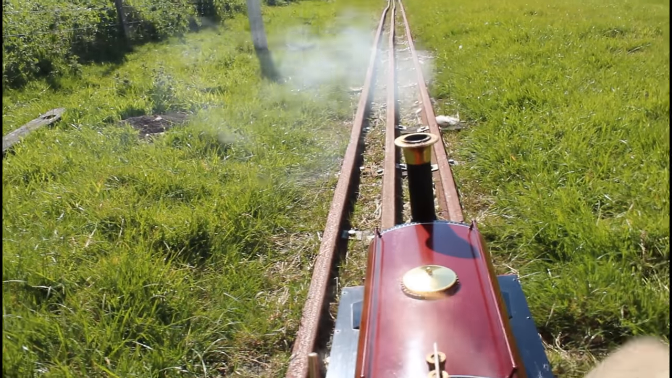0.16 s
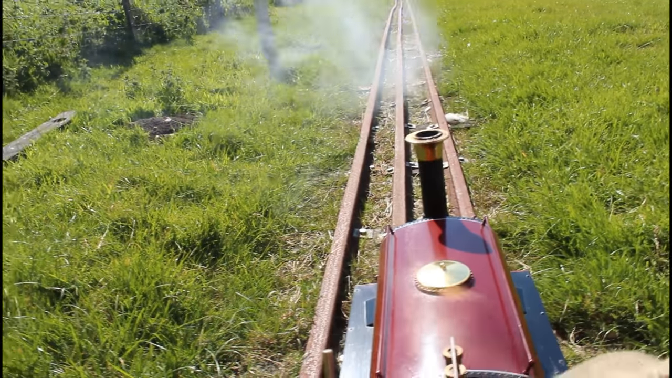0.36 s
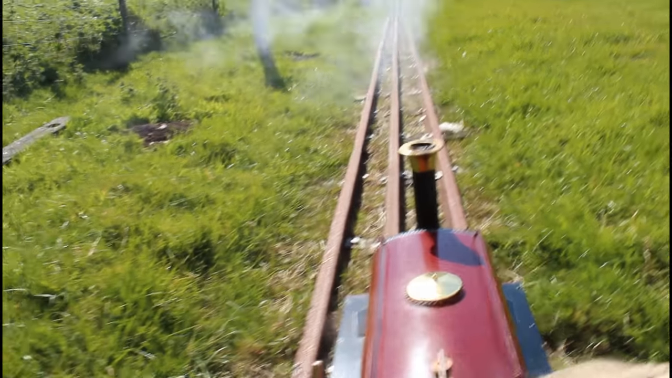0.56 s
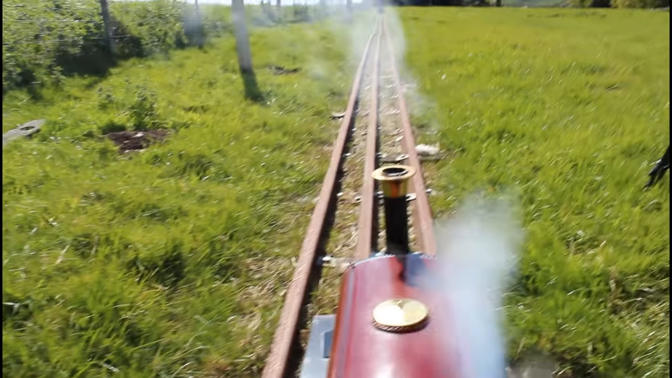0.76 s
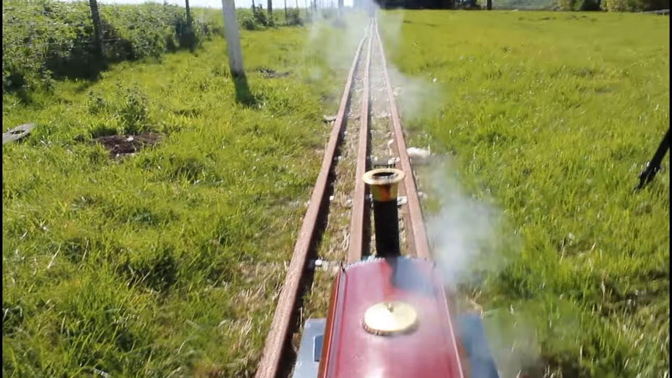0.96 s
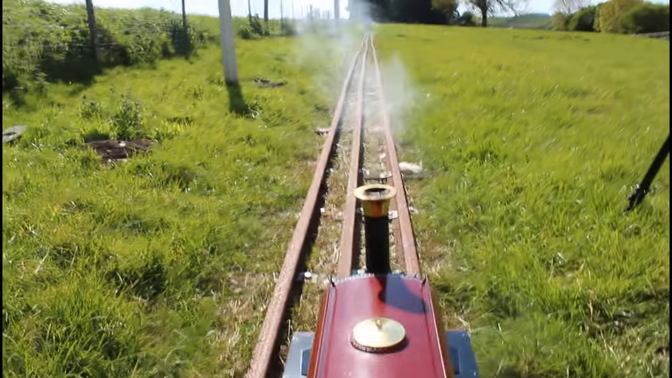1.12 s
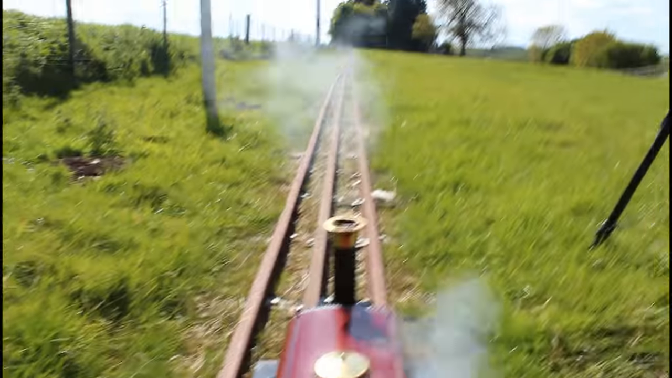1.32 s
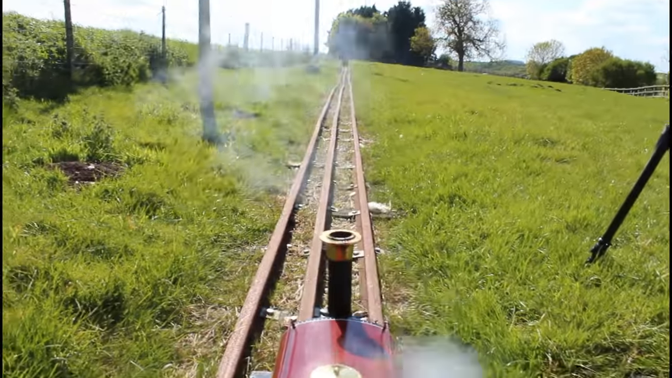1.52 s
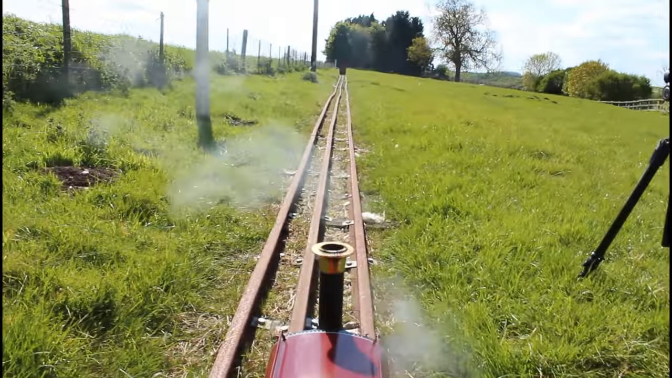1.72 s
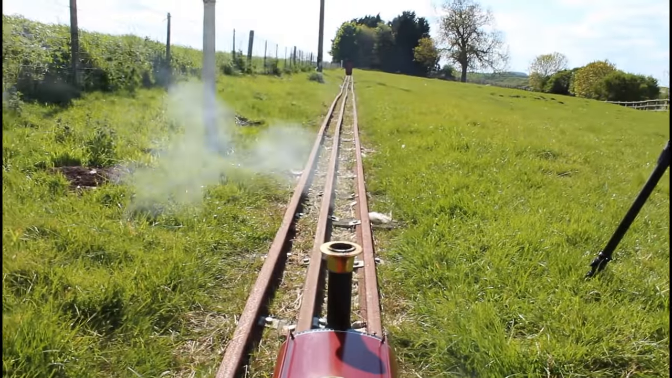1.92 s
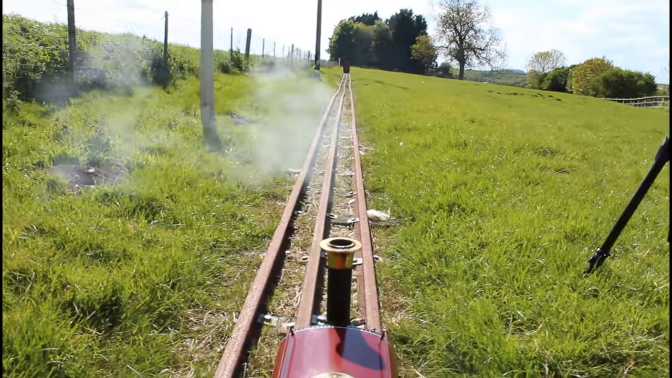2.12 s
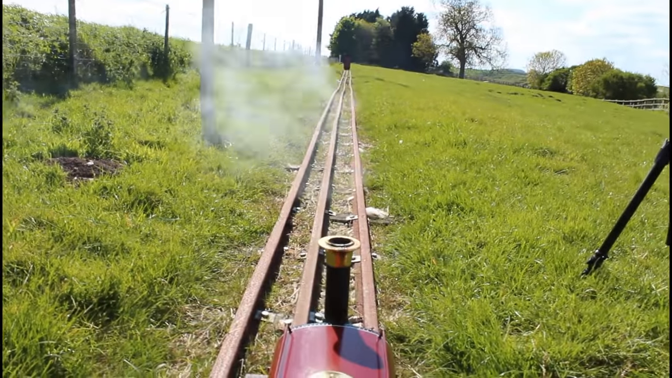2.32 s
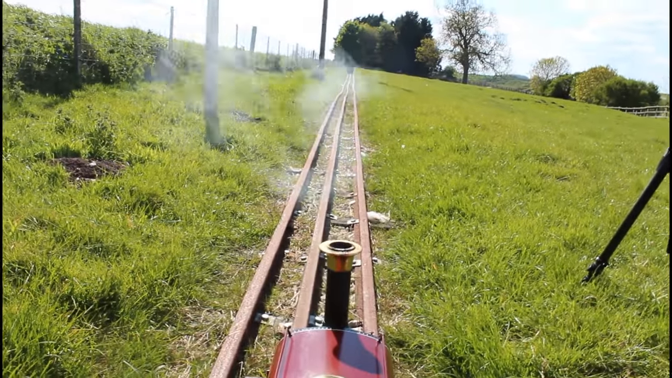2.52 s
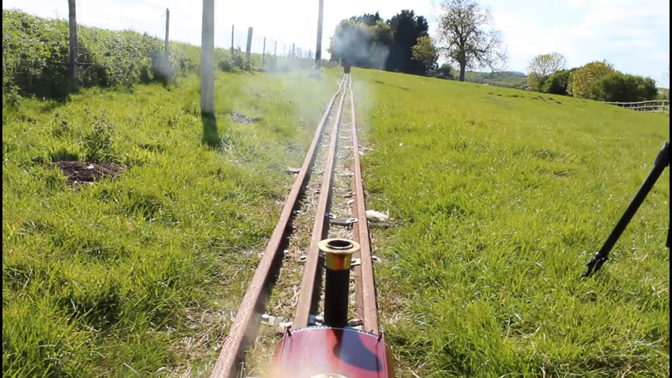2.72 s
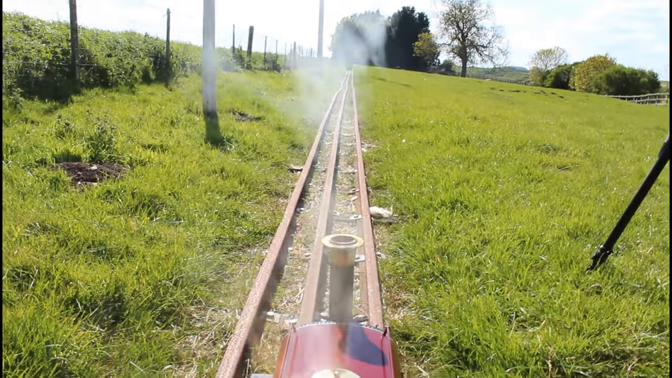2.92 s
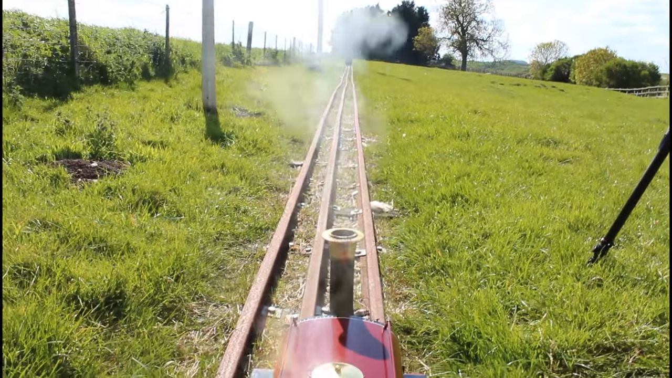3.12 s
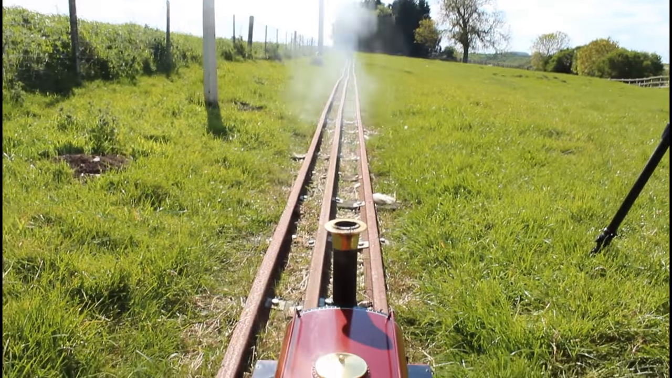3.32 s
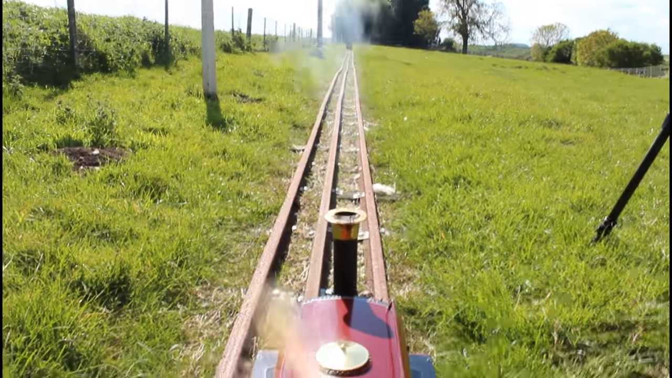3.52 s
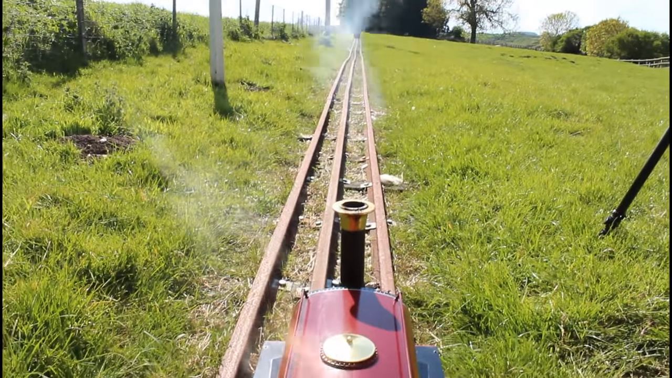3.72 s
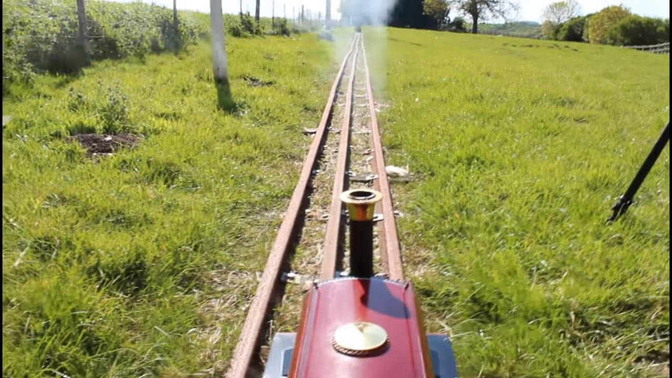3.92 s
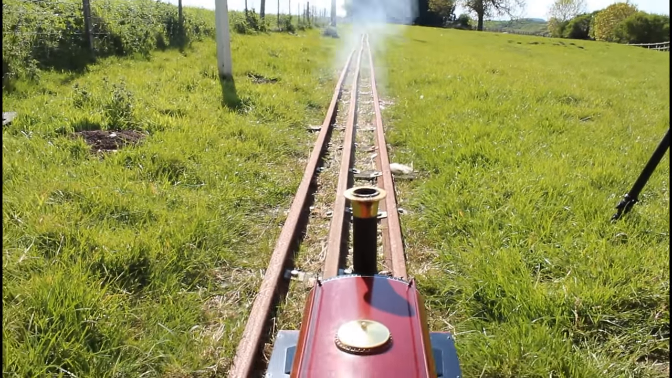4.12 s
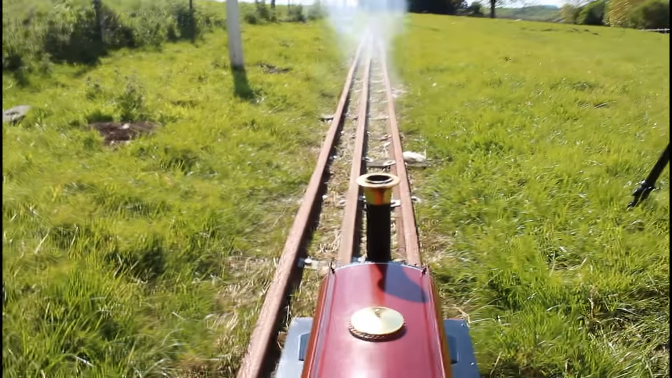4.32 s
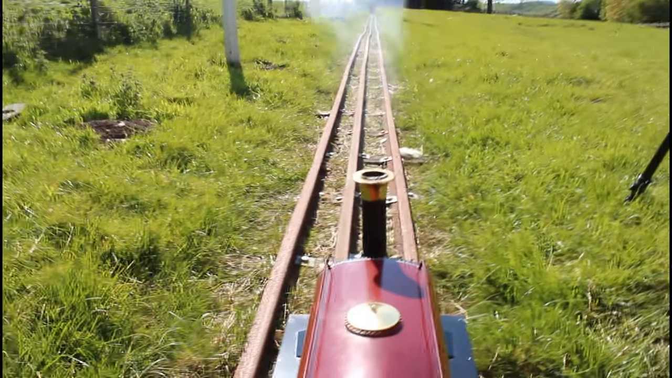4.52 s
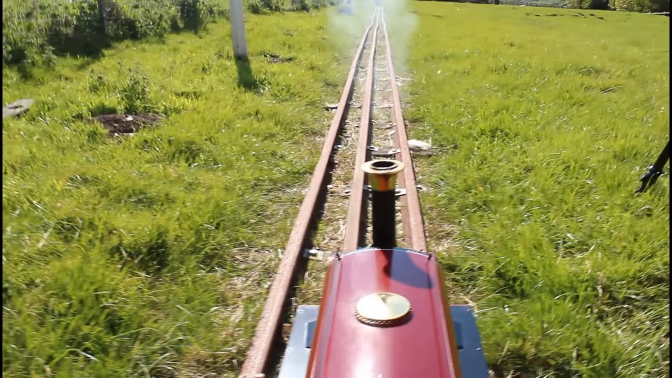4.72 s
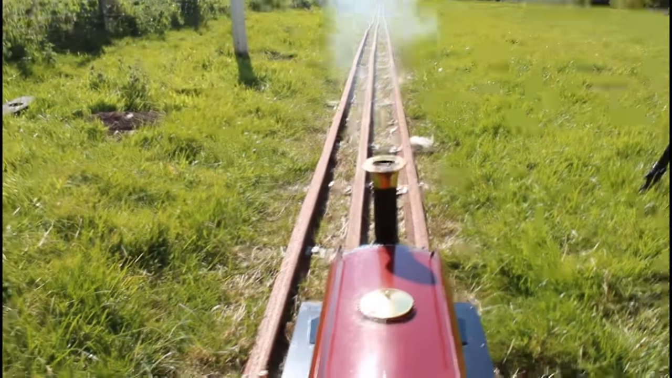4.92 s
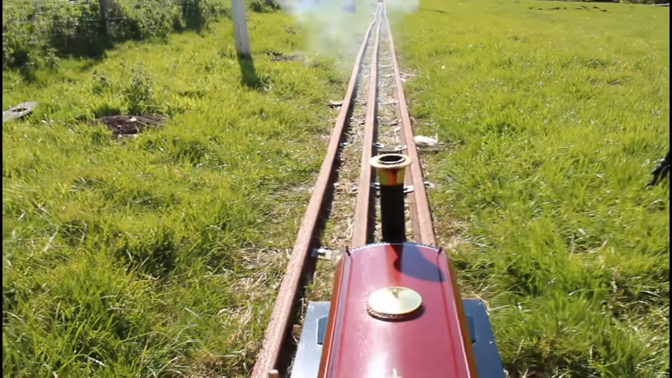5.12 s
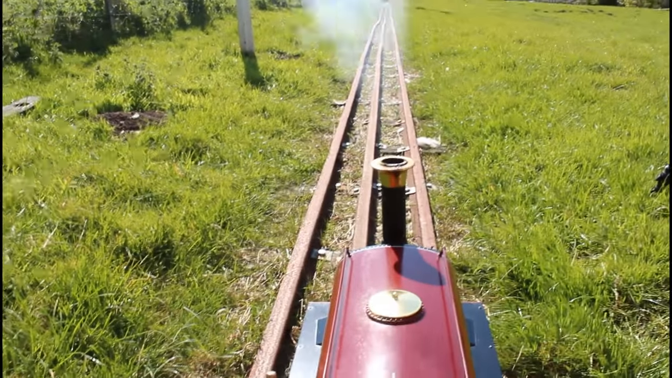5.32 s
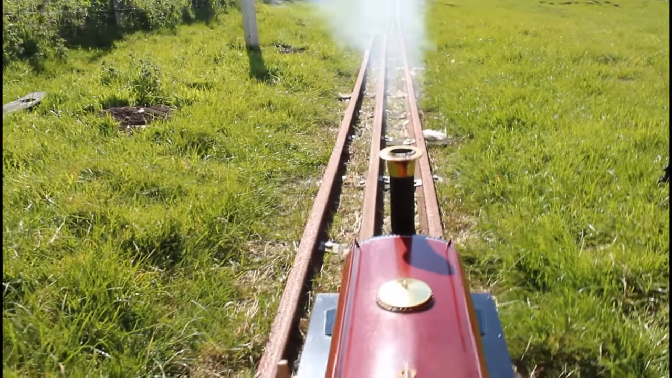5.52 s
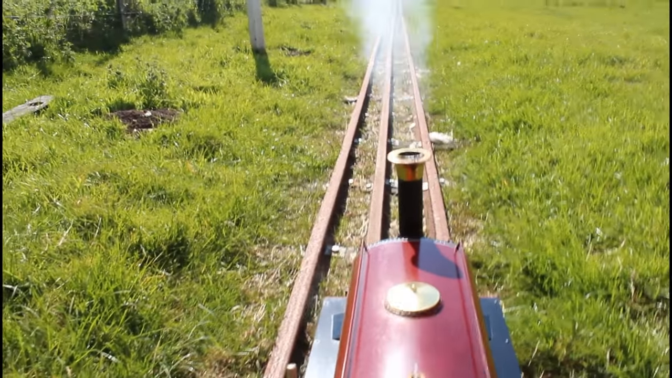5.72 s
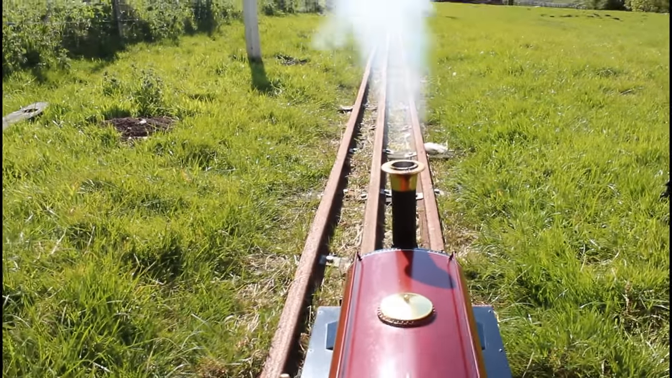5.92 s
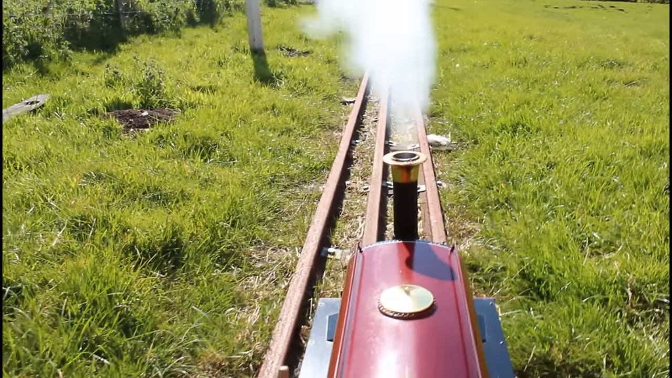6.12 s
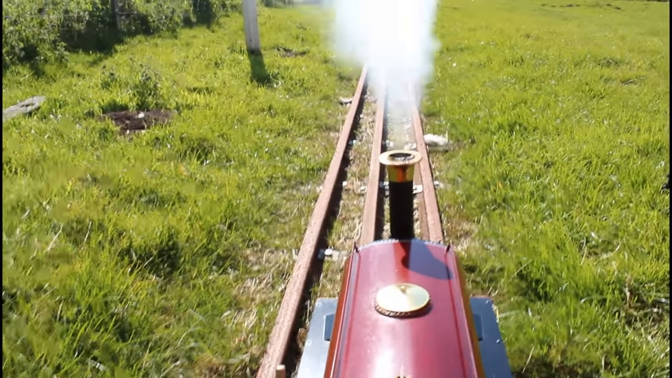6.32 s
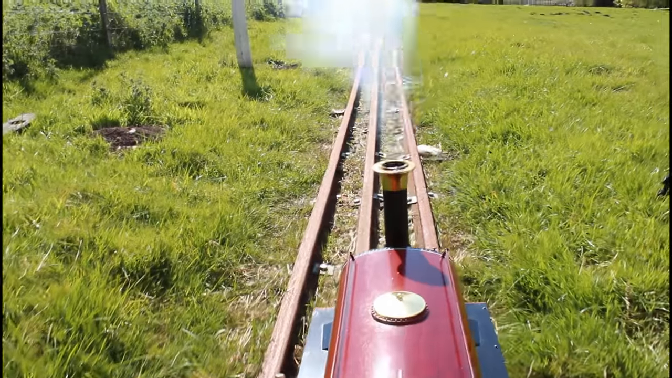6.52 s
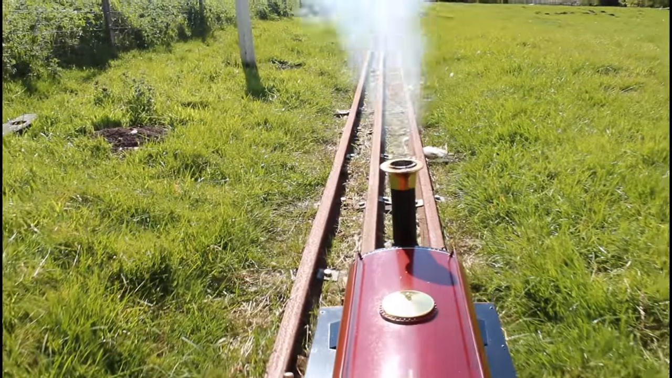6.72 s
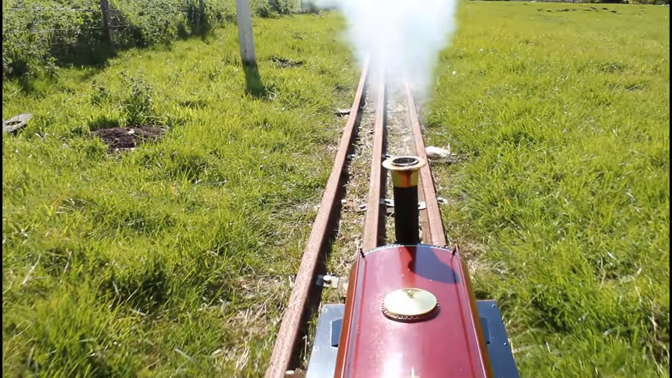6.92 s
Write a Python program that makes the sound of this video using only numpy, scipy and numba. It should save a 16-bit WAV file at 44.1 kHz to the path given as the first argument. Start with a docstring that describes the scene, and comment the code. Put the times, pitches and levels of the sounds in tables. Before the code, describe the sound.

A tiny live-steam engine sets off across a field, heard very close with almost no echo. Chimney steam rushes softly above a humming fire. A small dry spit leads to three piercing, spluttering water-and-steam bursts with birdlike squeals. Hiss then recovers and holds until gritty crunches and hollow bumps begin, the rolling roar swells, and hard rail knocks close it.

```python
"""Open field, driver's seat of a miniature live-steam locomotive pulling away.
Blower steam, resonating noise, hisses up the chimney over the fire's harmonic hum.
Three wet spurts from a side pipe mix noise, drop chirps and gliding squeals; loud treble ducks the gain.
Then grains and noise drive the wheel and frame modes: rumble, flange grind, crushed grit, rail knocks."""
import sys
import numpy as np
from scipy import signal
from scipy.fft import rfft, irfft
from scipy.io import wavfile
from scipy.ndimage import uniform_filter1d
from numba import njit

SR = 44100
rng = np.random.default_rng(int(sys.argv[2]) if len(sys.argv) > 2 else 0)


def log_audio(samples):
    """Write samples as a 16-bit WAV file to the path given in sys.argv[1]."""
    # one column per channel
    frames = np.atleast_2d(samples).T
    # limit to full scale, then quantise
    limited = np.clip(frames, -1, 1)
    pcm = np.round(limited * 32767).astype(np.int16)
    wavfile.write(sys.argv[1], SR, pcm)


N = 311327
T = np.arange(N) / SR

# steam spurts, levels before the jet's mix gains:
# fully_open_s, shut_s, first_level_db, last_level_db, first_chirp_hz, top_chirp_hz, ring_out_db
SPURT_ROWS = [(.697, 1.033, -28.5, -29.5, 3250, 7030, -33.5), (1.281, 1.451, -28, -34, 4450, 8500, -40),
              (1.548, 1.746, -31.5, -28.5, 6800, 8000, -24)]
# water slugs coughed out with the steam: start_s, length_s, level_db
SLUG_ROWS = [(0.574, 0.065, -38), (0.717, 0.065, -21.5), (.86, 0.027, -28), (1.266, 0.087, -28),
             (1.611, .023, -23.5)]
# spectrum of the running roar and the steel clack: freq_hz, level_db
ROAR_SPECTRUM = [(300, 7.5), (550, 1.5), (670, 0), (830, 4.5), (1080, 5), (1250, -4), (1850, -21),
                 (2300, -8.5), (2600, -9), (4000, -8.5), (6000, -35), (9000, -35), (15000, -41)]


def undb(db):
    """Decibels to amplitude gain."""
    return 10 ** (np.asarray(db) / 20)


def unit(x):
    """Scale to rms 1."""
    return x / np.sqrt(np.mean(x ** 2))


def noise():
    """White Gaussian noise."""
    return rng.standard_normal(N)


def fader(rows):
    """Gain from (s, dB) rows; the last level holds 30 ms, silent outside."""
    time_s, level_db = np.transpose(rows)
    on = (T >= time_s[0]) & (T <= time_s[-1] + .03)
    return undb(np.interp(T, time_s, level_db)) * on


def walk(rate_hz):
    """Smooth random wander, rms 1: random steps averaged twice."""
    size = max(int(SR / rate_hz), 2)
    steps = np.repeat(rng.standard_normal(N // size + 1), size)[:N]
    return unit(uniform_filter1d(uniform_filter1d(steps, size), size))


def colour(x, points):
    """Filter to (Hz, dB) points, falling away below the first; rms 1."""
    hz, db = np.transpose(points)
    f = np.maximum(np.fft.rfftfreq(N, 1 / SR), 1)
    skirt = np.minimum(f / hz[0], 1) ** 2
    gain = undb(np.interp(np.log(f), np.log(hz), db))
    return unit(irfft(rfft(x) * skirt * gain, N))


def band(x, lo_hz, hi_hz):
    """Third-order Butterworth band-pass."""
    return signal.sosfilt(signal.butter(3, [lo_hz, hi_hz], "band", fs=SR, output="sos"), x)


def in_band(x, lo_hz, hi_hz):
    """Scale so that one band has rms 1."""
    return x / np.std(band(x, lo_hz, hi_hz))


def ring(x, modes):
    """Sum of resonances (Hz, width Hz, dB) driven by x."""
    return sum(undb(db) * signal.lfilter(*signal.iirpeak(hz, hz / width_hz, fs=SR), x)
               for hz, width_hz, db in modes)


def grains(rate_hz, scatter_db):
    """Dense random impacts of uneven size, rms 1."""
    hits = rng.random(N) < rate_hz / SR
    size = rng.standard_normal(N)
    spread_db = scatter_db * np.clip(rng.standard_normal(N), -2, 2)
    return unit(hits * size * undb(spread_db))


def swell(start_s, length_s, edge):
    """Rounded burst; edge is the share of its length spent rising, and again falling."""
    u = np.clip((T - start_s) / length_s, 0, 1)
    out, on = np.zeros(N), (u > 0) & (u < 1)
    nearest_end = np.minimum(u[on], 1 - u[on])
    out[on] = np.sin(np.pi / 2 * np.minimum(nearest_end / edge, 1))
    return out


def swells(rows, edge):
    """Summed gain of (start s, length s, dB) bursts."""
    return sum(undb(db) * swell(start_s, length_s, edge) for start_s, length_s, db in rows)


def strike(start_s, db, t60_s):
    """Gain of a blow: instant attack, exponential decay."""
    decay_db = np.minimum(60 * np.maximum(T - start_s, 0) / t60_s, 200)
    return (T >= start_s) * undb(db - decay_db)


def glides(rows, wobble, flutter_db):
    """Short gliding sines, rising faster than they die, that shake in pitch and level."""
    out = np.zeros(N)
    shake = 1 + wobble * walk(500)
    flutter = undb(flutter_db * walk(400))
    for start_s, length_s, from_hz, to_hz, db in rows:
        at = np.arange(int(start_s * SR), int((start_s + length_s) * SR))
        u = np.linspace(0, 1, len(at))
        hz = (from_hz + (to_hz - from_hz) * u) * shake[at]
        shape = np.sin(np.pi * u ** .8) ** .7
        out[at] += undb(db) * shape * flutter[at] * np.sin(2 * np.pi * np.cumsum(hz) / SR)
    return out


def reflect(x, lag_ms, share):
    """Add a close reflection, which combs the treble."""
    return (x + share * np.interp(T - lag_ms / 1000, T, x)) / np.hypot(1, share)


def flow(opens_s, shuts_s, first_db, last_db):
    """Strength of one spurt: quick rise, slow drift, quick cut."""
    open_db_per_s, shut_db_per_s = 850, 950
    opening_db = open_db_per_s * np.maximum(opens_s - T, 0)
    shutting_db = shut_db_per_s * np.maximum(T - shuts_s, 0)
    drift_db = np.interp(T, [opens_s, shuts_s], [first_db, last_db])
    return undb(drift_db - np.minimum(opening_db + shutting_db, 200))


def sputter(count, lo_hz, hi_hz):
    """Water drops in the jet chirp at random times and pitches."""
    when, pitch, length, bend, size = rng.random((count, 5)).T
    start_s = SPURT_ROWS[0][0] + when * (SPURT_ROWS[-1][1] - SPURT_ROWS[0][0])
    hz = lo_hz * (hi_hz / lo_hz) ** pitch
    end_hz = hz * (0.868 + 0.255 * bend)
    rows = np.transpose([start_s, 0.0036 + 0.017 * length, hz, end_hz, -9 * size])
    return glides(rows, wobble=0.019, flutter_db=1)


def jet():
    """Turbulent steam and water drops leave the pipe, scaled by the flow; slugs push it up."""
    # freq_hz, level_db
    spectrum = [(120, -21.5), (340, -5), (480, -17.5), (750, -7), (1300, -7), (1750, 1), (3200, 0.5),
                (4500, -1), (6500, -1), (9000, -4.5), (11500, -6), (15500, -2)]
    slug_surge_db = 4
    surge_db = slug_surge_db * sum(swell(s, length_s, edge=.24) for s, length_s, _ in SLUG_ROWS)
    opening = sum(flow(*row[:4]) for row in SPURT_ROWS) * undb(surge_db + walk(35.07))
    spray = colour(noise() + 0.9 * grains(3000, 1.7), spectrum)
    spray = in_band(reflect(spray, .8 + .04 * walk(8), .2), 10500, 15500)
    gurgle = undb(17) * sputter(count=100, lo_hz=1950, hi_hz=3496)
    fizz = undb(11) * sputter(count=90, lo_hz=5730, hi_hz=9260)
    return opening * (undb(12 + 1.25 * walk(120)) * spray + gurgle + fizz)


def chirps(opens_s, shuts_s, first_hz, top_hz, count):
    """The jet hops between brief whistles, climbs, sinks, and drops to a low note after it shuts."""
    # low falling note just after the pipe shuts: delay_s, length_s, start_hz, end_hz, level_db
    shut_note = (.007, .01, 1782, 1572, -13)
    climb_share, sink_share = .75, .8  # share of the spurt; share of the top pitch
    mean_length_s, mean_db, spread_db = .013, -8, 3.5
    pitch_scatter, pitch_bend = .16, .11  # log ratio; share of pitch
    when, pitch, length, bend, size = rng.uniform(-1, 1, (count, 5)).T
    share = (np.arange(count) + .5 + when / 2) / count
    path_hz = np.interp(share, [0, climb_share, 1], [first_hz, top_hz, top_hz * sink_share])
    hz = path_hz * np.exp(pitch_scatter * pitch)
    start_s = opens_s + share * (shuts_s - opens_s - mean_length_s / 2)
    length_s = mean_length_s * (1 + length / 2)
    hops = np.transpose([start_s, length_s, hz, hz * (1 + pitch_bend * bend), mean_db + spread_db * size])
    delay_s, *low_note = shut_note
    return [*hops, (shuts_s + delay_s, *low_note)]


def squealing():
    """The wet jet locks briefly onto one whistle after another; engine and ground scatter a faint tail."""
    # timed whistles: start_s, length_s, start_hz, end_hz, level_db
    timed_notes = [(.595, 0.024, 1580, 1196, -20), (.626, 0.055, 1460, 1390, -26.5),
                   (.670, 0.037, 1500, 1587, -12), (.726, .013, 1620, 1664, 5),
                   (.754, 0.0037, 3920, 3970, 8.5), (.759, 0.038, 3524, 3610, 6.5),
                   (.787, .018, 3710, 3780, 8.5), (.852, .02, 5030, 5600, -5),
                   (.889, .011, 10140, 8350, -4), (.907, 0.017, 6360, 6300, 7),
                   (.946, 0.014, 8000, 8950, -4), (.988, 0.025, 6310, 6330, 2.5),
                   (1.023, .013, 5800, 7400, -0.5), (1.251, .01, 1620, 1630, -15),
                   (1.264, .026, 4040, 5150, -4.5), (1.281, 0.024, 4950, 4610, -0.5),
                   (1.299, 0.0071, 1020, 1270, -3.5), (1.326, 0.017, 6480, 6270, 8),
                   (1.353, 0.026, 6440, 6520, 5.5), (1.393, 0.047, 9150, 8940, -5),
                   (1.441, 0.021, 5980, 5240, -6), (1.520, 0.026, 1740, 1870, -5.5),
                   (1.537, 0.028, 4920, 5000, 7.5), (1.564, 0.017, 7250, 7340, 1),
                   (1.642, .026, 5830, 5800, -3), (1.658, 0.028, 6340, 6230, 2),
                   (1.675, .022, 8850, 8250, -4), (1.696, 0.028, 9600, 9600, 0)]
    hops = [note for opens_s, shuts_s, _, _, first_hz, top_hz, _ in SPURT_ROWS
            for note in chirps(opens_s, shuts_s, first_hz, top_hz, count=13)]
    squeal = glides(timed_notes, wobble=0.013, flutter_db=2.5)
    squeal = squeal + glides(hops, wobble=0.012, flutter_db=3.5)
    tail = noise() * undb(-60 * T / 0.2)
    scatter = signal.fftconvolve(squeal, tail / np.linalg.norm(tail))[:N]
    return squeal + undb(-19) * scatter


def ring_outs():
    """After each spurt the shut pipe's note sinks and dies away."""
    start_hz, sink_hz_per_s, t60_s, delay_s = 1770, 800, .48, .025
    out, waver = np.zeros(N), 1 + 0.0084 * walk(150)
    for _, shuts_s, *_, ring_db in SPURT_ROWS:
        start_s = shuts_s + delay_s
        hz = (start_hz - sink_hz_per_s * np.clip(T - start_s, 0, t60_s)) * waver
        fade_in = np.clip((T - start_s) / delay_s, 0, 1)
        out += strike(start_s, ring_db, t60_s) * fade_in * np.sin(2 * np.pi * np.cumsum(hz) / SR)
    return out


def slugs():
    """Water breaking up in the pipe mouth splutters as band-passed grains."""
    return unit(band(grains(2800, 2.6), 330, 2100)) * swells(SLUG_ROWS, edge=0.34)


def dry_spit():
    """A dry spit of steam: a short burst of coloured noise."""
    # start_s, length_s, level_db
    spit_rows = [(.371, 0.012, -22)]
    spectrum = [(300, -11), (1200, -11.5), (2600, 3), (5500, -2.5), (8300, -10), (9500, -20), (15000, -16)]
    return colour(noise(), spectrum) * swells(spit_rows, edge=.3)


def shaken(db_at_ref, db_per_db):
    """Gain of a rolling sound that follows how hard the track shakes the engine."""
    # time_s, shake_db
    shake_rows = [(3.1, -50.5), (3.6, -47.5), (4.7, -45.5), (5.05, -35.5), (5.19, -45.5), (5.55, -34.5),
                  (5.8, -36), (5.92, -29.5), (6.33, -28.5), (6.7, -30.5), (6.95, -23.5), (7.06, -25)]
    ref_db = -28
    return undb(db_at_ref) * (fader(shake_rows) / undb(ref_db)) ** db_per_db


def rolling():
    """Rough rail, as dense grains, shakes the frame and rings the wheel modes."""
    # freq_hz, level_db
    rumble_spectrum = [(40, -47), (75, -13), (110, -16), (170, 6.5), (220, 0.5), (330, -1.5), (420, -9),
                       (560, -5), (680, -32), (1200, -29), (3000, -42)]
    # freq_hz, width_hz, level_db
    wheel_modes = [(802, 39, -13), (1455, 59, 2.5), (1500, 69, -13), (2900, 120, -28), (3160, 160, -8.5),
                   (3990, 170, -14), (4990, 84, -18)]
    # time_s, level_db
    wheel_level = [(5.0, -59), (5.47, -50.5), (5.75, -41), (5.97, -33.5), (6.45, -32), (6.65, -41),
                   (6.85, -34.5), (6.95, -24.5), (7.06, -26.5)]
    rough = undb(0.78 * walk(60))
    rumble = in_band(colour(grains(1500, 2.5), rumble_spectrum), 130, 320)
    rumble = rumble * shaken(db_at_ref=-29.5, db_per_db=0.99) * undb(1.6 * walk(28))
    wheels = in_band(band(ring(grains(4000, 2), wheel_modes), 650, 6000), 1350, 1600)
    roar = in_band(colour(grains(2500, 2.7), ROAR_SPECTRUM), 650, 1250)
    roar = roar * shaken(db_at_ref=-39.5, db_per_db=1.44) * undb(walk(22))
    return rough * (rumble + wheels * fader(wheel_level) + roar)


def flange():
    """The flange sticks and slips on the rail: one wheel mode sings over a broad scrape."""
    # start_s, length_s, level_db
    rub_rows = [(5.55, 1.36, -44.5), (6.865, 0.22, -25.5)]
    singing = grains(4000, 2.3)
    for _ in range(2):
        singing = ring(singing, [(2830, 170, 0)])
    scrape_modes = [(2160, 200, 5), (2330, 160, 2), (3750, 230, 3), (4630, 310, -25)]
    scrape = ring(band(grains(1800, 3), 1800, 5800), scrape_modes)
    return (unit(singing) + undb(-4.5) * unit(scrape)) * swells(rub_rows, edge=.4)


def grit_and_knocks():
    """Crushed grit and sharp blows ring the frame; steel on steel adds a clack and a bright crack."""
    # grit under the wheels: start_s, length_s, level_db
    crunch_rows = [(4.39, .17, -36), (4.682, 0.083, -34.5), (4.752, .054, -23), (4.8, 0.079, -28.5),
                   (4.857, 0.14, -35.5), (5.07, 0.051, -31), (5.281, 0.059, -26.5), (5.37, 0.077, -31),
                   (6.396, 0.062, -25), (6.47, 0.1, -28.5), (6.93, 0.075, -21)]
    # wheels and couplings: start_s, blow_db, crack_db
    knock_rows = [(4.454, -25, -33), (5.259, -18, -31), (5.424, -14.5, -32), (6.013, -18, -29),
                  (6.299, -22, -20.5), (6.717, -16, -25), (6.774, -18.5, -42), (6.818, -9, -18.5),
                  (6.914, -3, -10.5), (6.95, -5, -20)]
    # freq_hz, width_hz, level_db
    frame_modes = [(387, 60, 10), (534, 160, 4), (818, 40, 9.5), (1000, 81, -2), (1570, 410, 4)]
    # freq_hz, level_db
    crack_spectrum = [(400, -23), (1000, 12), (1600, 10.5), (2500, -6), (4000, -3), (6500, -14.5),
                      (9000, -36), (15000, -40)]
    knock_t60_s, crack_t60_s, clack_db = 0.11, 0.033, -14
    crush = swells(crunch_rows, edge=0.31) * undb(1.3 * walk(70))
    grit = grains(2500, 3.7)
    frame_gain = 1 / np.std(ring(grit, frame_modes))
    blows = sum(strike(s, db, knock_t60_s) for s, db, _ in knock_rows)
    drive = grit * crush + undb(-10.5) * noise() * blows
    frame = frame_gain * ring(drive, frame_modes)
    clack = colour(noise(), ROAR_SPECTRUM) * blows * undb(clack_db)
    cracks = sum(strike(s, db, crack_t60_s) for s, _, db in knock_rows)
    return band(frame, 290, 1150) + clack + colour(noise(), crack_spectrum) * cracks


def frame_bumps():
    """Hollow frame bumps: low tones of a few cycles that sag in pitch."""
    # start_s, start_hz, level_db
    bump_rows = [(5.378, 580, -17.5), (5.831, 230, -21.5), (6.24, 237, -20), (6.297, 300, -26)]
    start_cycles, sag = 5.5, 0.72  # length in cycles of the start pitch; end/start pitch
    notes = [(s, start_cycles / hz, hz, hz * sag, db) for s, hz, db in bump_rows]
    return band(glides(notes, wobble=0.071, flutter_db=3), 134, 1200)


def grumble():
    """A wheel grumbles along a rough stretch of rail as low band-passed grains."""
    return undb(-42.5) * unit(band(grains(1500, 3.1), 270, 565)) * swell(4.68, 1.0, edge=.2)


def steady_steam():
    """Blower noise rings the chimney beside a leaking valve; the boiler top mirrors both as the rider sways."""
    # freq_hz, level_db
    blower_spectrum, leak_spectrum = [(240, -41), (400, -11), (606, -10.5), (740, -14), (1290, -7.5),
                                      (1550, -14.5), (1860, -4.5), (2380, -10.5), (3090, -3.5), (3660, -12),
                                      (5380, -15.5), (8280, -20.5), (9510, -23.5), (14400, -21),
                                      (15800, -18)], [(350, -12), (700, -17), (1200, -21), (2000, -2.5),
                                                      (2700, -2), (4500, 1), (5500, 0), (6600, -12),
                                                      (7400, -3), (8400, -4.5), (8900, -14.5),
                                                      (10000, -9.5), (13000, -6.5), (15500, -5.5)]
    # freq_hz, width_hz, level_db
    chimney_modes = [(2714, 174, 4), (3240, 950, -7.5), (4254, 200, 4), (5440, 510, 2.5), (7500, 330, 2.5),
                     (8260, 290, 2.5), (13500, 660, 4.5), (14800, 400, -7)]
    # time_s, level_db; the draught is the hollow sound while the engine starts
    blower_level, leak_level, draught_level = [(0, -41), (2.1, -41.5), (3.3, -41.5), (4.1, -38.5),
                                               (5.5, -39.5), (7.06, -41)], [(0, -34), (.3, -35), (.5, -34),
                                                                     (1.1, -42), (1.7, -55), (2.0, -56),
                                                                     (2.3, -87)], [(0, -47.5),
                                                                                         (2.0, -48.5),
                                                                                         (3.4, -43.5),
                                                                                         (4.0, -51.5),
                                                                                         (5.0, -63)]
    blower = colour(noise(), blower_spectrum)
    blower = blower + ring(blower, chimney_modes)
    blower = unit(reflect(blower, 1.3 + .04 * walk(1.2), .17))
    draught_modes = [(1094, 460, -5.5), (1895, 530, 2), (2480, 490, -6)]
    draught = unit(ring(band(noise(), 900, 2960), draught_modes))
    leak = reflect(colour(noise(), leak_spectrum), 1.245 + .005 * walk(3), .35)
    hiss = blower * fader(blower_level) * undb(1.43 * walk(7.7)) + draught * fader(draught_level)
    return hiss + leak * fader(leak_level) * undb(.5 * walk(33))


def running_drone():
    """The running gear drones on a wavering tone and its octave, with a low noise shudder."""
    # time_s, level_db (before the mix gains)
    drone_level = [(4.0, -59), (4.31, -44.5), (5.43, -41.5), (5.46, -46.5), (6.52, -43.5), (7.06, -45)]
    pitch_hz = 87
    turn = 2 * np.pi * np.cumsum(pitch_hz * (1 + 0.007 * walk(20.6))) / SR
    tone = (np.sin(turn) + undb(-17) * np.sin(2 * turn)) * undb(walk(25))
    shudder = unit(band(noise(), 73, 132))
    return (undb(2.5) * tone + undb(-10.5) * shudder) * fader(drone_level)


def fire_hum():
    """Fire in the flues hums on upper harmonics of one wavering pitch."""
    # time_s, level_db (before the mix gain)
    hum_level = [(0, -44.5), (1.15, -44), (1.8, -38.5), (3.13, -40), (3.4, -53), (3.9, -70)]
    # harmonic_number, level_db
    partials = [(3, 0), (4, -16), (5, -11.5), (6, -9)]
    base_hz = 48
    turn = 2 * np.pi * np.cumsum(base_hz * (1 + 0.0036 * walk(7.86))) / SR
    hum = sum(undb(db + walk(8.7)) * np.sin(k * turn) for k, db in partials)
    return undb(-3) * hum * fader(hum_level)


def flames():
    """Steady low flame noise."""
    # freq_hz, level_db
    spectrum = [(25, -18), (50, -10.5), (78, 0.5), (110, -7), (190, -4.5), (300, -10.5), (450, -13),
                (800, -29.5)]
    return undb(-48) * colour(noise(), spectrum)


def scene():
    """Everything on the engine, in open air."""
    spurts = jet() + squealing() + ring_outs() + slugs() + dry_spit()
    track = rolling() + flange() + grit_and_knocks() + frame_bumps() + grumble()
    background = steady_steam() + running_drone() + fire_hum() + flames()
    return (spurts + track + background)[None, :]


@njit
def follow(want, attack, release):
    """Rise quickly towards the wanted cut, sink back at a steady rate."""
    out, cut = np.empty(len(want)), 0.
    for i in range(len(want)):
        if want[i] > cut:
            cut = cut + (want[i] - cut) * attack
        else:
            cut = max(cut - release, want[i])
        out[i] = cut
    return out


def gain_control(x, threshold_db, depth_db, attack_s, release_db_per_s):
    """Loud treble turns the gain down, by no more than the depth."""
    treble = signal.sosfilt(signal.butter(2, 3500, "high", fs=SR, output="sos"), x)
    power = np.abs(uniform_filter1d(treble ** 2, size=220))  # 5 ms mean
    level_db = 10 * np.log10(power + 1e-12)
    want_db = np.clip(level_db - threshold_db, 0, depth_db)
    return x * undb(-follow(want_db, 1 / (attack_s * SR), release_db_per_s / SR))


def record(dry):
    """Microphone chain: automatic gain, clipping just under full scale, steep treble cut."""
    top_hz = 15850
    held = gain_control(dry[0], threshold_db=-26, depth_db=13, attack_s=0.0032, release_db_per_s=37)
    clipped = np.clip(held, -.88, .88)
    return signal.sosfilt(signal.ellip(12, .2, 80, top_hz, fs=SR, output="sos"), clipped)[None, :]


dry = scene()
out = record(dry)
log_audio(out)
```